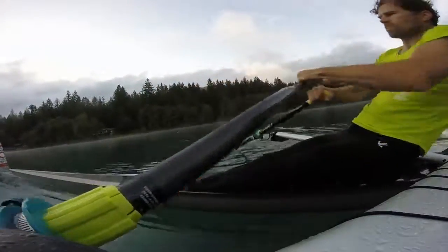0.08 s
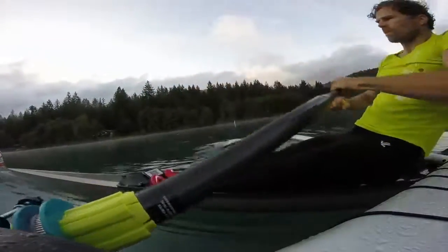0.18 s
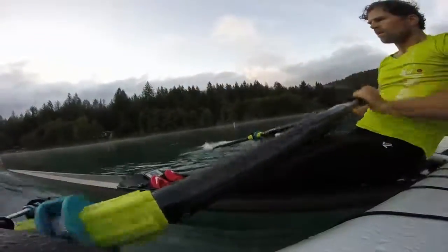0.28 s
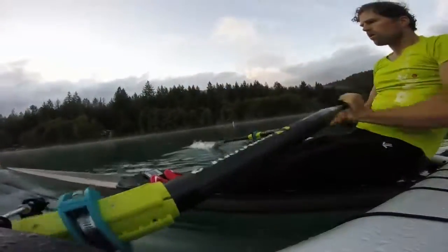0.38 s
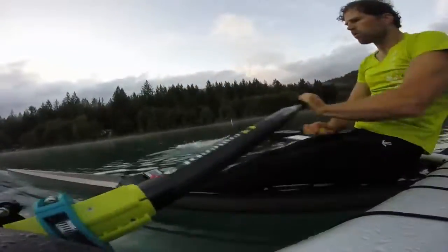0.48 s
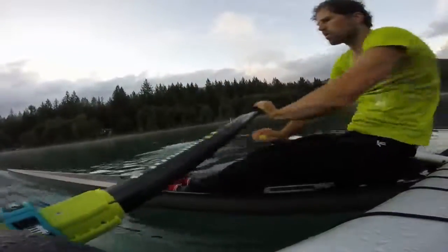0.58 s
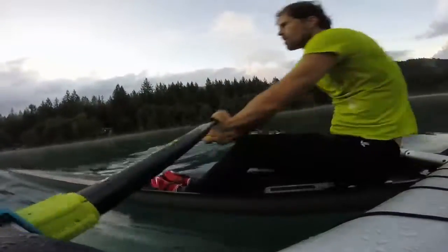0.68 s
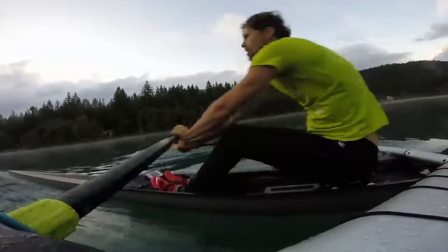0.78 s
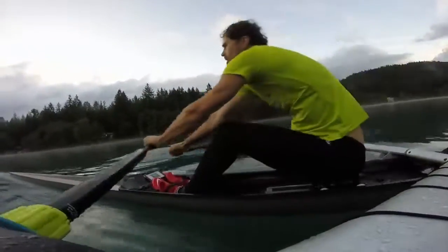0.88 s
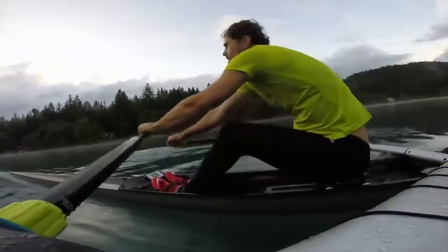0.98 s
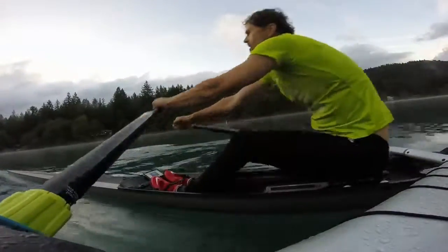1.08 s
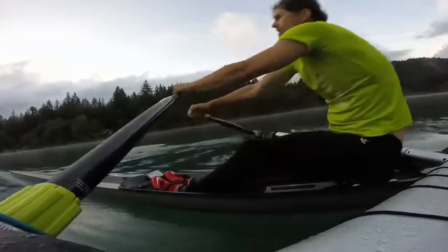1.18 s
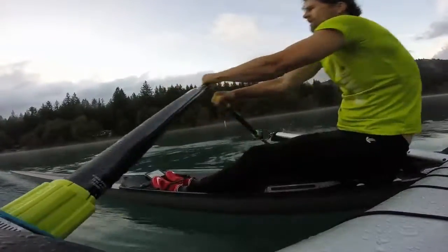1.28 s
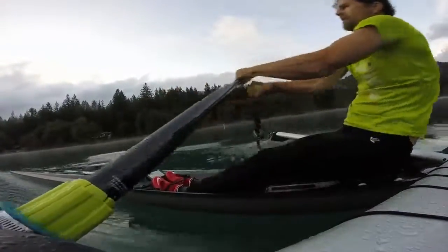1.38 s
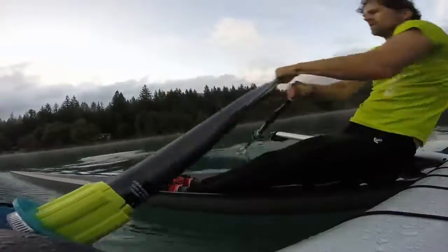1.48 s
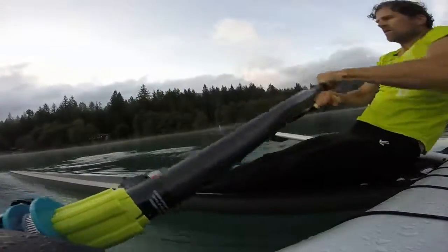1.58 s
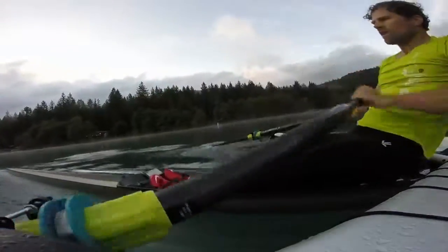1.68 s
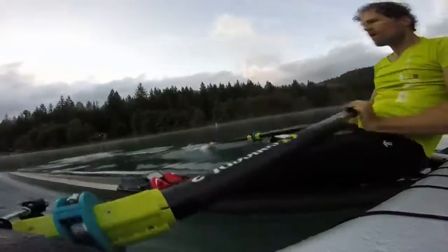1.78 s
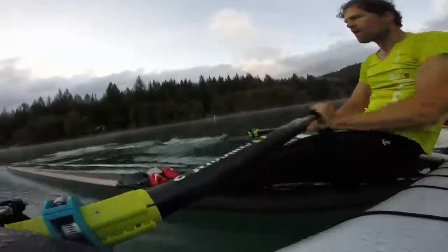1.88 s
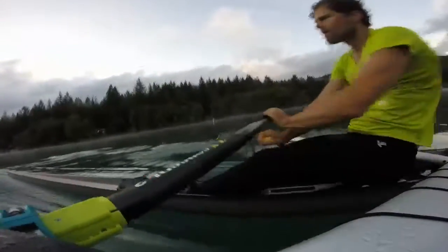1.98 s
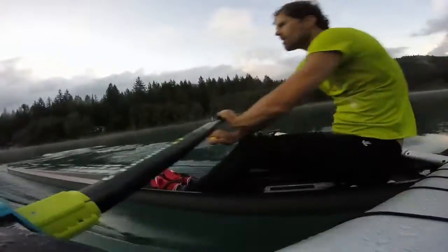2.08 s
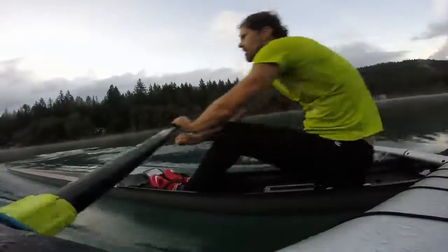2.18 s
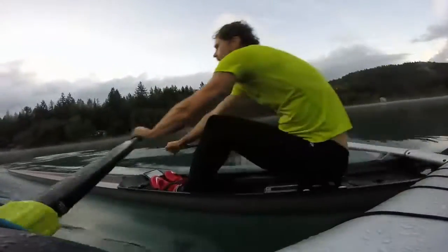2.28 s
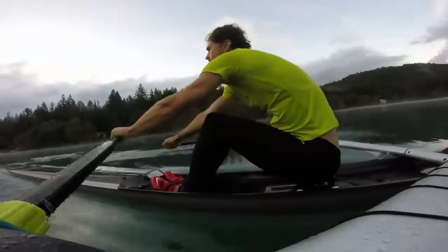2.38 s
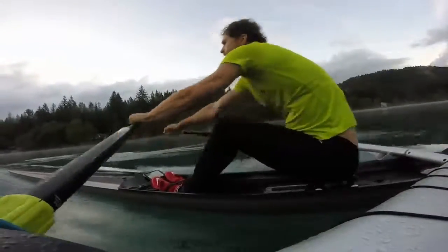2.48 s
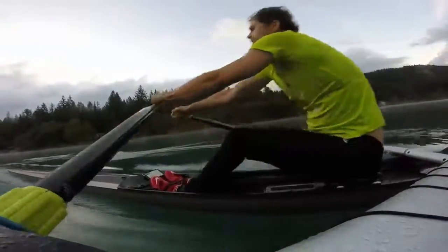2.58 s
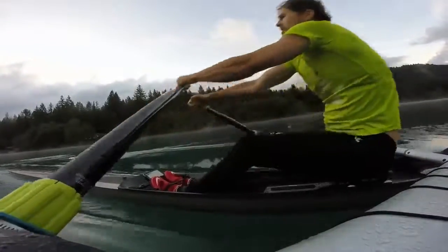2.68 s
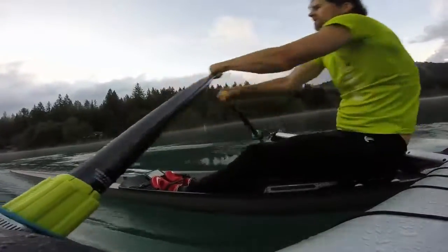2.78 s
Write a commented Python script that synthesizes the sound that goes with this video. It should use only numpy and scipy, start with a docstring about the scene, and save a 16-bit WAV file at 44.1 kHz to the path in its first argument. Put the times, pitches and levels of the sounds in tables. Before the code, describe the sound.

Rowing oars knock and thud in their locks, with close rattling, through two strokes.

```python
"""On the rigger of a rowing shell: a camera in a sealed housing, through two strokes.
The oar knocks in its lock and thuds through the rigger; each jolt sets the mount rattling.
The rigger sways and shakes. Water along the hull adds a dull, lapping rumble and a faint hiss.
Slow gain control ducks loud bursts; peaks overload softly."""
import sys
import numpy as np
from scipy import signal
from scipy.fft import rfft, irfft
from scipy.io import wavfile
from scipy.ndimage import uniform_filter1d

SR = 44100
rng = np.random.default_rng(int(sys.argv[2]) if len(sys.argv) > 2 else 0)


def bounce(signal):
    """Save signal as a 16-bit WAV file at the path given by the first command-line argument."""
    frames = np.transpose(np.atleast_2d(signal))
    limited = np.clip(frames, -1, 1)
    pcm = np.round(limited * 32767).astype(np.int16)
    wavfile.write(sys.argv[1], SR, pcm)


N = 125685

# oar and seat thuds: (time [s], level [dB], tilt to upper modes [dB])
THUDS = [(0.214, -6.5, -13), (0.222, -5, -6), (0.314, -10.5, -11), (0.335, -6.5, -0.5), (0.378, -4, -3.5),
         (0.472, -13.5, -4.5), (0.672, -10, -4.5), (0.764, -14.5, -1), (0.866, -10.5, 47),
         (0.895, -4, -1.5), (1.057, -25, 6.5), (1.211, -19.5, -43.5), (1.677, -2.5, 1.5), (1.69, -7, 3),
         (1.754, -14, -2), (1.804, -3.5, 0.5), (1.932, -18, 30.5), (2.022, -7, 1), (2.224, -8.5, 0),
         (2.271, -14, -2.5), (2.331, -5, -7.5), (2.368, -11, 10), (2.407, -14, -1.5), (2.502, -15.5, -3),
         (2.692, -16, -13)]
# rigger frame modes: (frequency [Hz], level [dB], T60 [s], tilt share [-])
FRAME_MODES = [(84.5, -2, 0.065, 0.062), (137.2, -19.5, 0.7, -0.47), (154, 4.5, 0.036, -0.16),
               (249, -5, 0.066, 0.93), (334.6, -6.5, 0.042, 0.96), (462.6, -11, 0.064, 0.27),
               (760, -23.5, 0.091, .7)]
# mount clacks: (time [s], level [dB], tilt to upper modes [dB])
CLACKS = [(0.3186, -2, 1.5), (0.341, -10, -2), (0.3554, -1, 27), (0.3834, -4, 30), (0.3966, -1.5, 2),
          (0.4144, -7.5, 5.5), (0.4218, -8.5, 1.5), (0.4312, -18, 7), (0.4827, -16, -3), (0.4968, -3, 1.5),
          (0.5179, -12, -5), (0.54, -14, 0), (0.5464, -4, 1), (0.574, -8.5, 1.5), (0.585, -15, -14),
          (0.6054, -16, 24), (0.675, -1.5, 6), (0.688, -27, 2), (0.7061, -12.5, 2), (0.7181, -5.5, 1),
          (0.746, -9, 3), (0.7668, -16.5, -1), (0.7869, -8.5, 0), (0.7987, -16, -5.0), (0.8843, -5, -4),
          (0.9039, -1, -2.5), (0.9129, -8, 12), (0.9383, -8.5, -2), (0.9519, -13, -5),
          (1.1325, -12.5, -0.5), (1.6858, -12, 6.5), (1.7211, -6.5, -2.5), (1.7361, 1, 1.5),
          (1.7538, -10.5, -3), (1.804, -6, 3), (1.8109, 3.5, 12), (1.8221, -2, 3), (1.8763, -6.5, 5.5),
          (1.8902, -12, 10.5), (1.9051, -8, 7), (1.933, -12.5, -1), (1.9719, -10.5, 13.5), (1.999, -6, 21),
          (2.0072, -8, -6.5), (2.0305, -3, 2), (2.0352, -8, 5), (2.053, -15.5, 6.5), (2.0933, -5.5, 34),
          (2.0992, -16, 6), (2.234, -2, 3.5), (2.2817, 2, 19.0), (2.2858, -20.5, 10), (2.3128, -16, -4),
          (2.3354, 1.5, 10), (2.3414, -20.5, 6), (2.3476, -10, 1.5), (2.3734, -3, 5.5),
          (2.3884, -9.5, 34.5), (2.41, -7.5, -0.5), (2.5369, -11.5, -6.5)]
# housing modes: (frequency [Hz], level [dB], T60 [s], tilt share [-])
HOUSING_MODES = [(1451, 8.5, 0.011, -1), (2290, 2, 0.017, 0.4), (2523, 2.5, 0.01, 1),
                 (3193, -2.5, 0.017, 0.64), (4150, -18, .01, 0.59), (2425, -24.5, 0.13, 0.55),
                 (485, -5, 0.034, -0.1)]
# lone thin ticks: (time [s], level [dB])
TICKS = [(0.2237, -28), (0.2335, -31.5), (0.2511, -31.5), (0.286, -35), (0.3045, -33), (0.3884, -28),
         (0.662, -50), (0.8411, -39), (0.871, -34), (0.9981, -40), (1.03, -43.5), (1.097, -46.5),
         (1.1251, -44.5), (1.1506, -40.5), (1.234, -48), (1.6815, -23.5), (1.6973, -24.5), (1.7674, -45.5),
         (1.8503, -36.5), (1.95, -36), (2.07, -45.5), (2.12, -47.5), (2.1911, -44), (2.2476, -37),
         (2.4265, -41), (2.5086, -41.5), (2.607, -45)]
# rigger motion: (time [s], sway level [dB], shake level [dB])
RIGGER_MOTION = [(0.187, -30.5, -33), (0.246, -5.5, -34.5), (.42, -22, -24), (0.619, -18.5, -33),
                 (0.991, -22.5, -39), (1.201, -31.5, -38.5), (1.648, -44.5, -45), (1.686, -15, -29),
                 (2.05, -20.5, -28.5), (2.16, -25, -37), (2.419, -25.5, -43), (2.561, -20, -34.5),
                 (2.701, -36, -39)]
# hull resonances: (frequency [Hz], width [Hz], level [dB])
HULL_BANDS = [(302, 170, -52.5), (435, 47, -65), (752, 45, -70), (1145, 30, -65), (1325, 450, -59),
              (2490, 87, -68.5), (3160, 150, -75), (4150, 300, -86.5)]
# spectrum of ticks, grit and hiss: (frequency [Hz], gain [dB])
TREBLE_CURVE = [(900, -41.5), (2000, 8), (4500, -1.5), (8000, -8.5), (13500, -22.5), (16000, -59)]

THUD_RISE_CYCLES, CLACK_RISE_CYCLES = 1, 1.61
TICK_T60_S, TICK_RIPPLE_DB, TICK_RE_CLACK_DB = 0.03, 4, -29.5
RATTLE_ABOVE_DB, RATTLE_RE_JOLT_DB, RATTLE_T60_S, GRIT_RE_RATTLE_DB = -16, -36.5, 0.1, -9.5
BOUNCES_PER_S, BOUNCE_SPREAD_DB, RING_RE_TICK_DB = 160, 4, 16.5
SWAY_HZ, SWAY_WIDTH_HZ, BUMPS_PER_S = 40.7, 24, 150
LAP_SPREAD_DB, HISS_BASE_DB = 1.9, -69
DUCK_ABOVE_DB, DUCK_DB_PER_DB, DUCK_LAG_S = -22.5, 0.18, 0.24
KNEE, CEILING = 0.8, 0.95
LOW_CUT_HZ, HIGH_CUT_HZ = 18, 15850


def oar_thuds():
    """Oar and seat blows ring the rigger frame."""
    out = np.zeros(N)
    for time_s, db, tilt_db in THUDS:
        add(out, time_s, gain(db) * ring(FRAME_MODES, tilt_db, THUD_RISE_CYCLES))
    return out


def mount_clacks():
    """Each clack rings the housing and throws off a tick; some ticks come alone."""
    out = np.zeros(N)
    rings = [ring(HOUSING_MODES, tilt_db, CLACK_RISE_CYCLES) for _, _, tilt_db in CLACKS]
    for (time_s, db, _), housing in zip(CLACKS, rings):
        add(out, time_s, gain(db) * housing)
        add(out, time_s - 0.001, tick(db + TICK_RE_CLACK_DB))
    for time_s, db in TICKS:
        add(out, time_s, tick(db))
    return out


def tick(db):
    """Short treble burst with a faint tail and random spectral ripple."""
    t = np.arange(1500) / SR
    burst = np.exp(-((t - 0.002) / 0.0019) ** 2)
    tail = 0.077 * np.minimum(t / 0.0049, 1) * gain(-60 * t / TICK_T60_S)
    spectrum = rfft(treble_noise(len(t)))
    ripple = unit_rms(uniform_filter1d(rng.standard_normal(len(spectrum)), size=60))
    noise = unit_rms(irfft(spectrum * gain(TICK_RIPPLE_DB * ripple), len(t)))
    return gain(db) * (burst + tail) * noise


def mount_rattle():
    """Faint bounces and scraping grit, dying away after each clack and hard thud."""
    envelope = np.zeros(N)
    decay = gain(RATTLE_RE_JOLT_DB - 60 * np.arange(SR // 4) / SR / RATTLE_T60_S)
    hard_thuds = [row for row in THUDS if row[1] > RATTLE_ABOVE_DB]
    for time_s, db, _ in CLACKS + hard_thuds:
        add(envelope, time_s, gain(db) * decay)
    strength = gain(BOUNCE_SPREAD_DB * np.minimum(rng.exponential(1, N), 4))
    bounces = envelope * strength * (rng.random(N) < BOUNCES_PER_S / SR)
    timbre, out = rng.integers(0, 16, N), np.zeros(N)
    for k, tilt_db in enumerate(np.linspace(-12, 16, num=16)):
        tap = gain(RING_RE_TICK_DB) * ring(HOUSING_MODES, tilt_db, CLACK_RISE_CYCLES)
        for sound in (tap, tick(0)):
            out += signal.oaconvolve(bounces * (timbre == k), sound)[:N]
    grit = gain(GRIT_RE_RATTLE_DB) * envelope * unit_rms(treble_noise(N))
    return out + grit


def rigger_motion():
    """Low sway of the rigger; small random bumps shake the frame."""
    t = np.arange(N) / SR
    time_s, sway_db, shake_db = np.transpose(RIGGER_MOTION)
    sway = resonate(rng.standard_normal(N), SWAY_HZ, SWAY_WIDTH_HZ)
    sway = resonate(sway, SWAY_HZ, width_hz=76)
    sway /= np.sqrt(uniform_filter1d(sway ** 2, size=9000))  # swings without pauses
    bumps = rng.standard_normal(N) * (rng.random(N) < BUMPS_PER_S / SR)
    tap = ring(FRAME_MODES, tilt_db=0.64, rise_cycles=THUD_RISE_CYCLES, vary=False)
    shake = unit_rms(signal.oaconvolve(bumps, tap)[:N])
    return gain(np.interp(t, time_s, sway_db)) * sway + gain(np.interp(t, time_s, shake_db)) * shake


def hull_water():
    """Lapping noise through hull resonances, plus faint hiss; louder in the boat's opening surge."""
    drift = uniform_filter1d(uniform_filter1d(rng.standard_normal(N), size=900), size=900)
    lap = gain(LAP_SPREAD_DB * unit_rms(drift))
    hull = np.zeros(N)
    for hz, width_hz, db in HULL_BANDS:
        band = resonate(lap * rng.standard_normal(N), hz, width_hz)
        hull += gain(db) * unit_rms(resonate(band, hz, width_hz))
    hiss = gain(HISS_BASE_DB) * lap * unit_rms(uniform_filter1d(treble_noise(N), size=2))
    surge_db = np.interp(np.arange(N) / SR, [0.2, 1.2], [9, 0])
    return gain(surge_db) * (hull + hiss)


def ring(modes, tilt_db, rise_cycles, vary=True):
    """Struck modes, peak 1; vary scatters level, tuning and phase."""
    hz, db, t60_s, tilt_share = np.transpose(modes)[:, :, None]
    scatter = rng.standard_normal((len(modes), 3)) if vary else np.zeros((len(modes), 3))
    offset_db, detune, phase_rad = (scatter * [0.42, 0.033, 1.656]).T[:, :, None]
    t = np.arange(round(t60_s.max() * SR)) / SR
    rise = np.sin(np.pi / 2 * np.minimum(t * hz / rise_cycles, 1)) ** 2
    decay = gain(db + tilt_share * tilt_db + offset_db - 60 * t / t60_s)
    tones = np.sin(2 * np.pi * hz * (1 + detune) * t + phase_rad)
    sound = (rise * decay * tones).sum(0)
    return sound / abs(sound).max()


def treble_noise(samples):
    """White noise shaped by TREBLE_CURVE."""
    curve_hz, curve_db = np.transpose(TREBLE_CURVE)
    hz = np.fft.rfftfreq(samples, 1 / SR)
    db = np.interp(np.log(hz + 1), np.log(curve_hz), curve_db)
    return irfft(rfft(rng.standard_normal(samples)) * gain(db), samples)


def resonate(x, hz, width_hz):
    """Single resonance, peak gain near 1."""
    radius = np.exp(-np.pi * width_hz / SR)
    pole = radius * np.exp(2j * np.pi * hz / SR)
    return 2 * signal.lfilter([1 - radius], [1, -pole], x).real


def gain(db):
    return 10 ** (np.asarray(db) / 20)


def unit_rms(x):
    return x / np.sqrt(np.mean(x ** 2) + 1e-20)


def add(mix, time_s, sound):
    part = mix[max(round(time_s * SR), 0):][:len(sound)]
    part += sound[:len(part)]


def scene():
    """Mount, rigger and water; mono."""
    return (mount_clacks() + mount_rattle() + oar_thuds() + rigger_motion() + hull_water())[None]


def record(dry):
    """Low cut, lagging gain control, soft overload, high cut."""
    x = signal.sosfilt(signal.butter(2, LOW_CUT_HZ, "high", fs=SR, output="sos"), dry)
    pole = np.exp(-1 / (DUCK_LAG_S * SR))
    lag = [1 - pole], [1, -pole]
    power = signal.lfilter(*lag, signal.lfilter(*lag, x ** 2))
    excess_db = np.maximum(10 * np.log10(power + 1e-12) - DUCK_ABOVE_DB, 0)
    x = x / gain(DUCK_DB_PER_DB * excess_db)
    over, headroom = np.maximum(abs(x) - KNEE, 0), CEILING - KNEE
    x = np.sign(x) * (np.minimum(abs(x), KNEE) + headroom * np.tanh(over / headroom))
    high_cut = signal.firwin(511, HIGH_CUT_HZ, window=("kaiser", 9), fs=SR)
    return signal.oaconvolve(x, high_cut[None], "same")


dry = scene()
out = record(dry)
bounce(out)
```